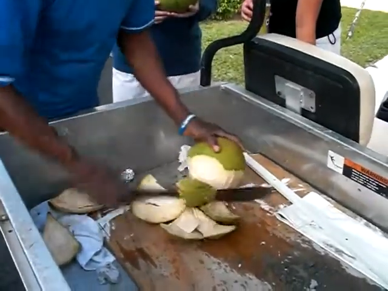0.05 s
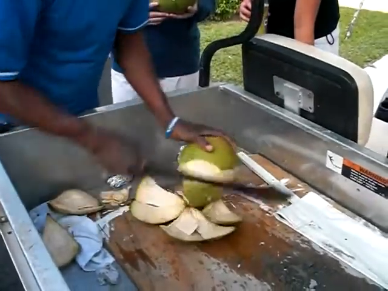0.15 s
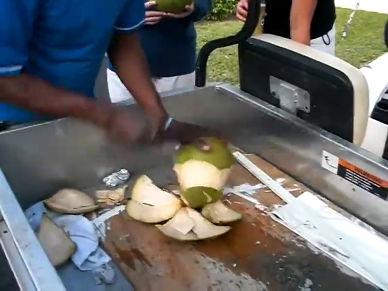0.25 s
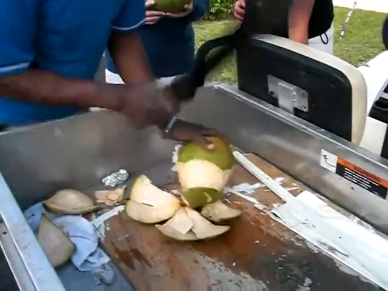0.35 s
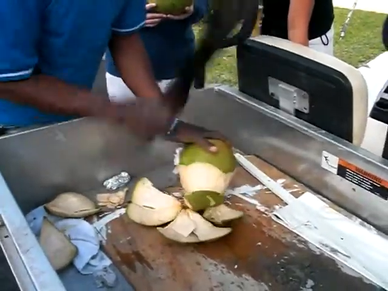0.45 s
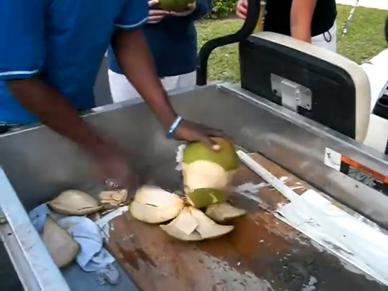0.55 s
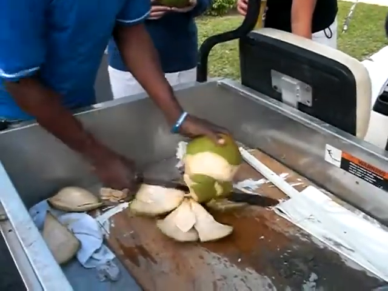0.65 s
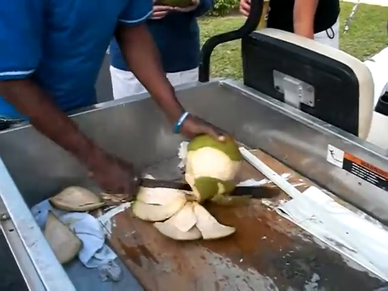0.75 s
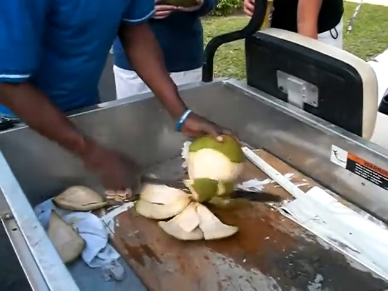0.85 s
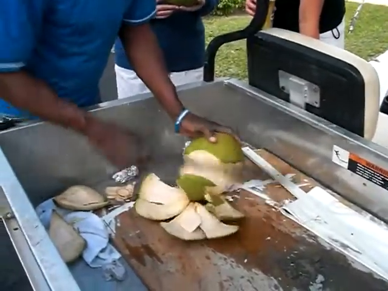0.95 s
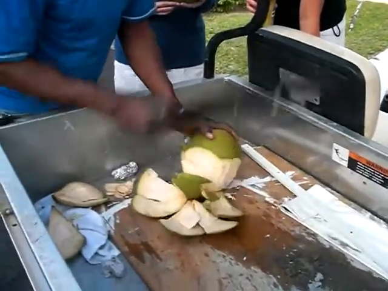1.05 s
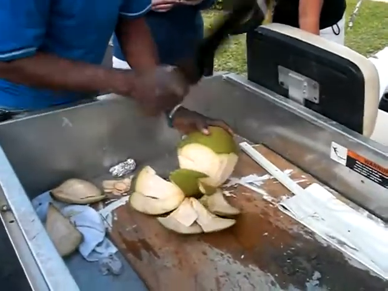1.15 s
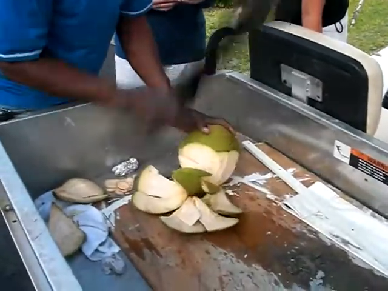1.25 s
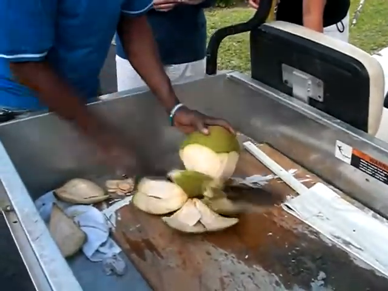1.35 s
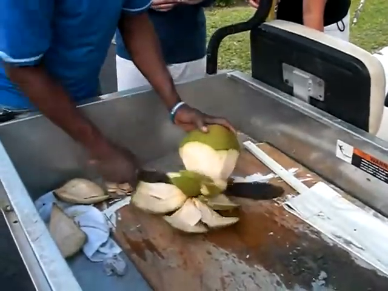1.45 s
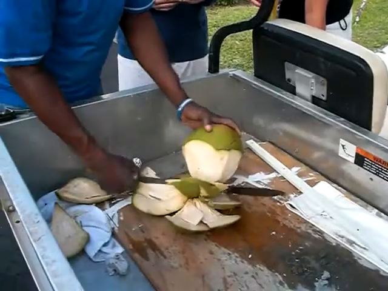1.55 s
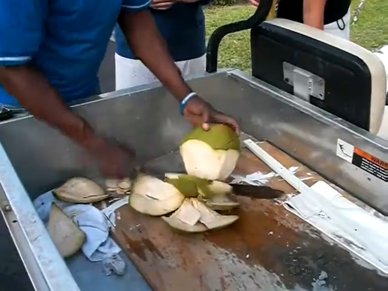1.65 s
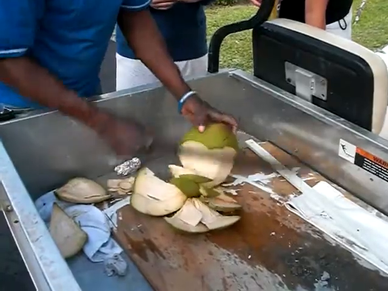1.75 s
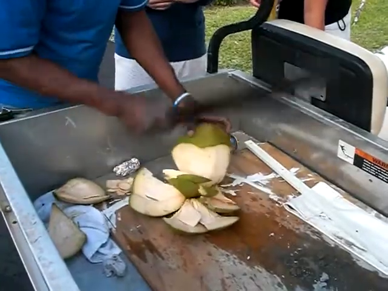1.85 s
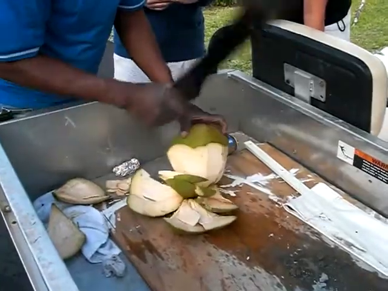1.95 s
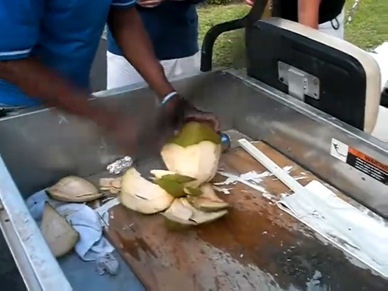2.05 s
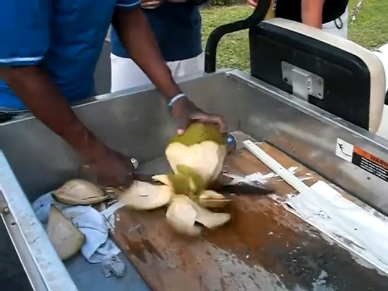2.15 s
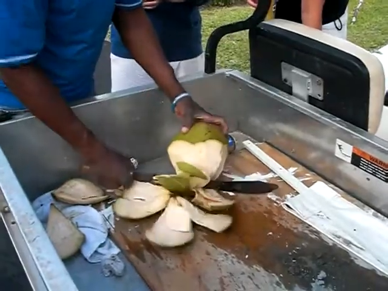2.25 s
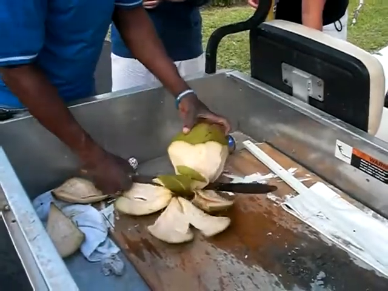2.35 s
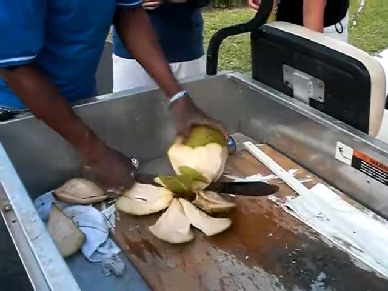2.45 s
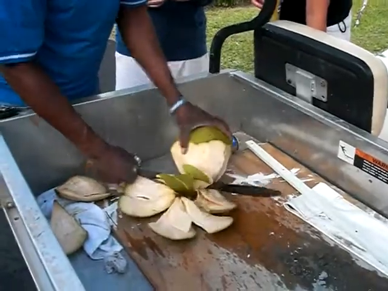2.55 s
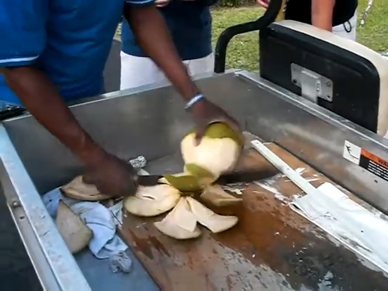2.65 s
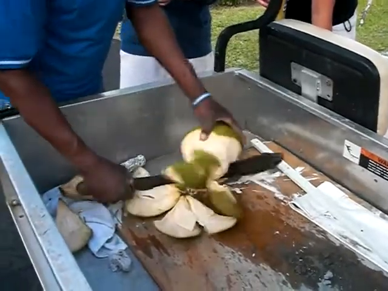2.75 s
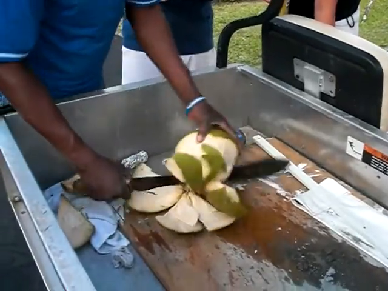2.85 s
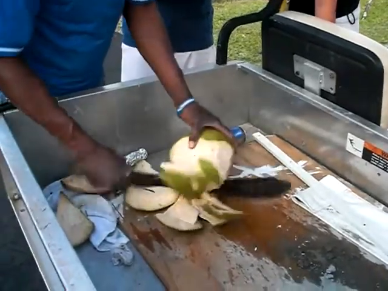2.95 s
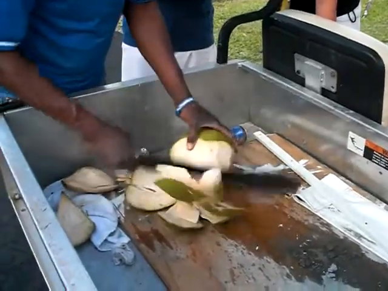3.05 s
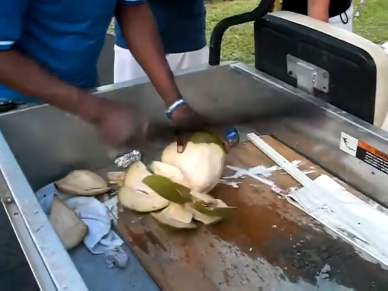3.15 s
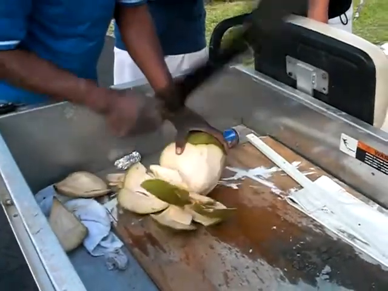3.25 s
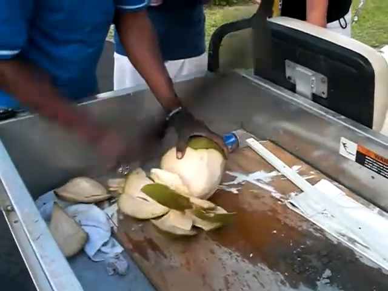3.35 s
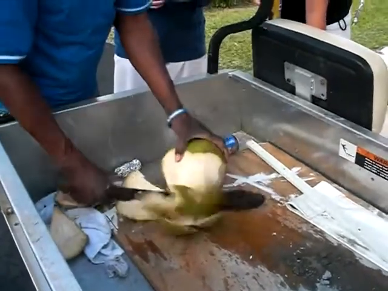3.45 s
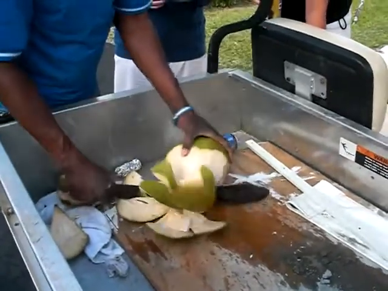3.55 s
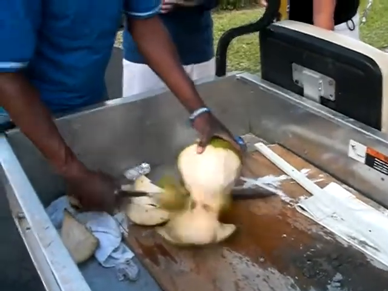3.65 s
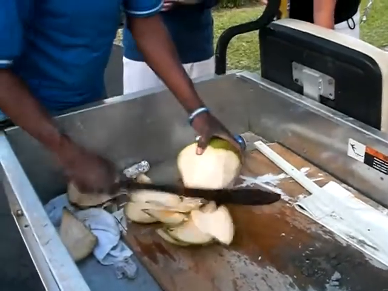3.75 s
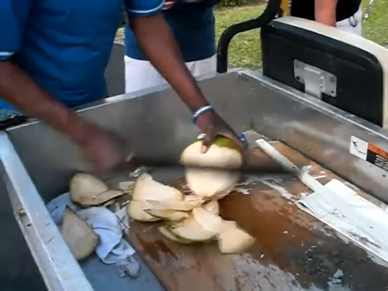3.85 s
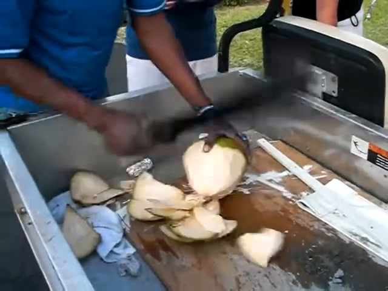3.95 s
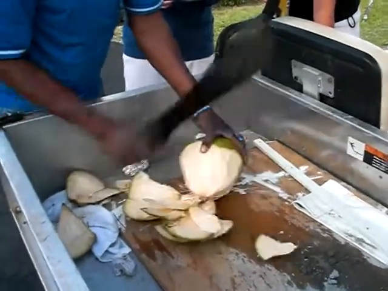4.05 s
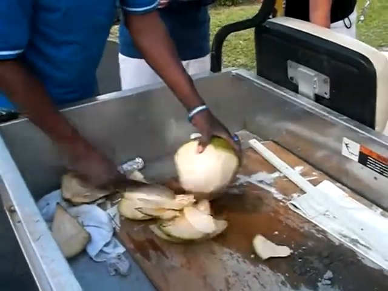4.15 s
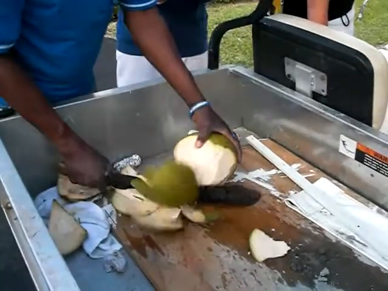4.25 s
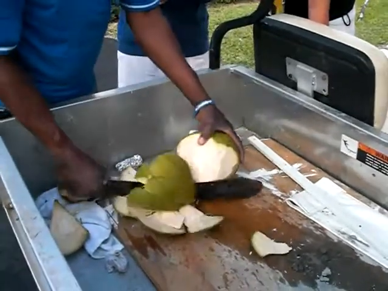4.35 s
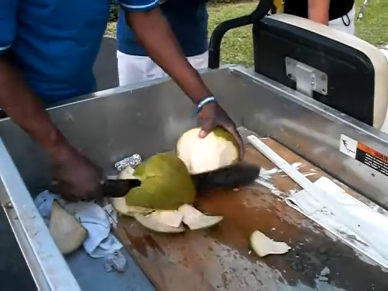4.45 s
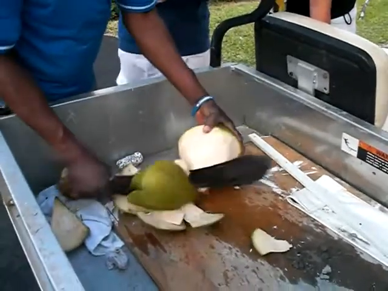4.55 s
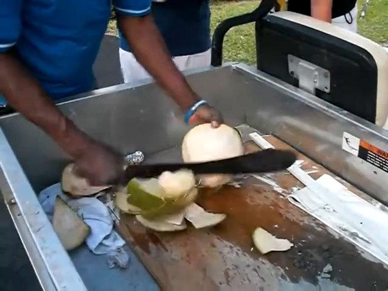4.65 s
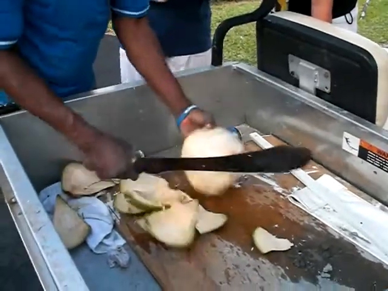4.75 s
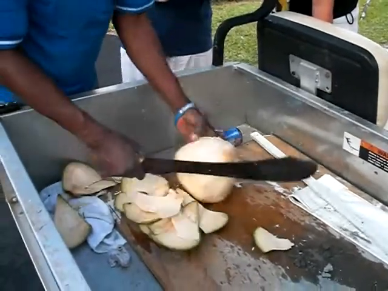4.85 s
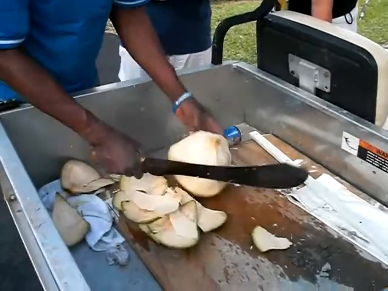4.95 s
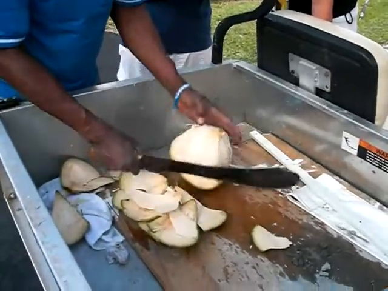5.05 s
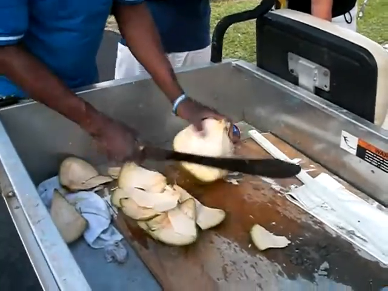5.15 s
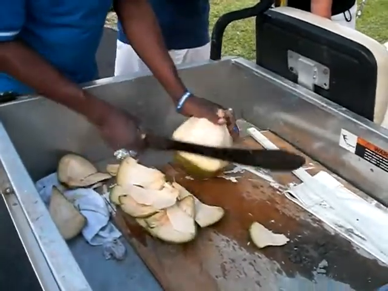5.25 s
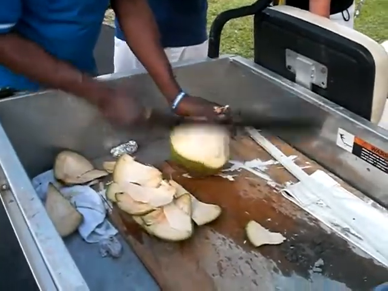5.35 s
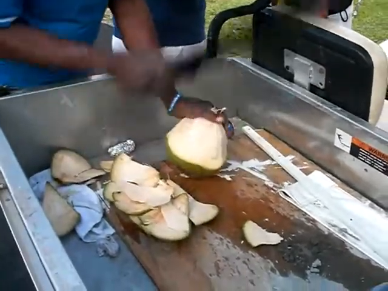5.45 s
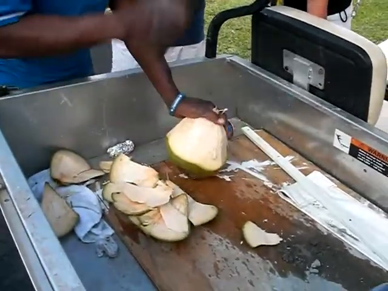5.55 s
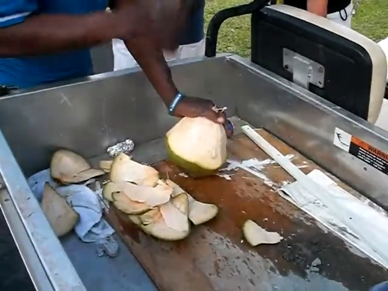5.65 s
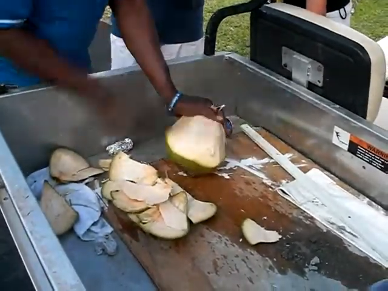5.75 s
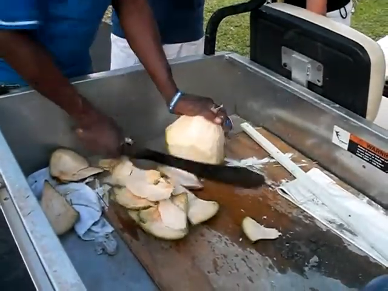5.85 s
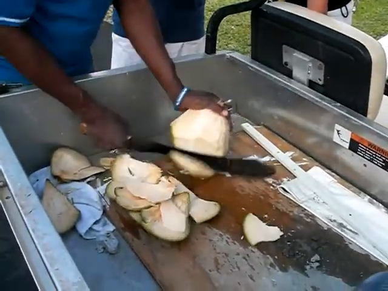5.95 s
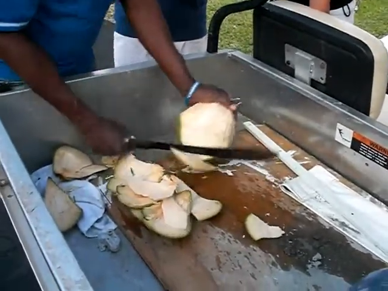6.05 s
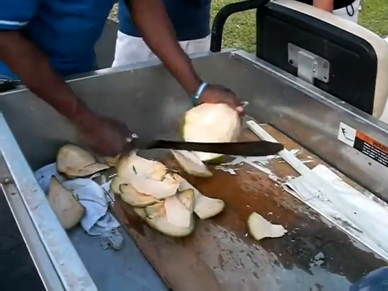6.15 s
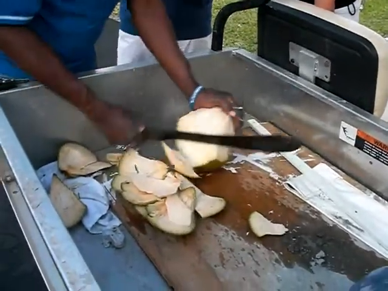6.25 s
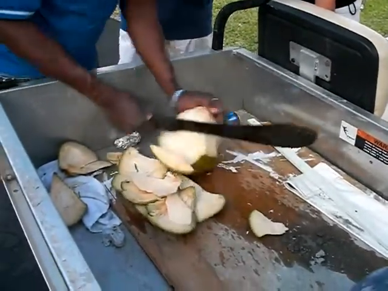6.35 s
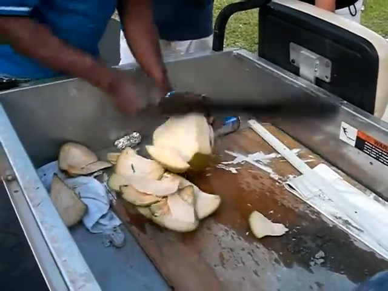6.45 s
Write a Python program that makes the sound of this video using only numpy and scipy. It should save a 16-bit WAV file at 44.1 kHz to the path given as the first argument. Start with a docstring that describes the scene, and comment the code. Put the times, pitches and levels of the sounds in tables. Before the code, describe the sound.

A close microphone outdoors is buffeted by low, fluttering wind from the first instant, over a faint uneven hiss. At about 0.55 s a machete rips wet husk and lands as a quick double knock on a wooden board, with crumbs and a short scrape after it. A deep, heavier thud comes at 1.35 s, then a sharper cracking whack at 2.13 s, each with a brief rattle of the sheet-metal bed. Light taps and faint scrapes lead to a more broken stroke at 3.43-3.6 s, with several clacks and dragging. Another chop at 4.17 s rattles the metal most; the blade scrapes free and sings very faintly near 4.65 s amid strong gusts. A short crisp chop follows at 4.81 s. Wind dies down after 5.1 s, leaving the loudest, brightest crack at 5.8 s, then tiny crumbs, taps and scrapes until 6.5 s.

```python
"""Gusts buffet the microphone from the start and on among the strokes of a machete that husks a green coconut.
The place is outdoors, on a wooden board in the sheet-metal bed of a cart, over a faint uneven background hiss.
In each of seven strokes shaped noise tears like wet fibre, then decaying modes and noise knock the board
and rattle the bed. Crumbs and taps are short noise bursts; scrapes are noise broken into slips. The wind is
low noise on a breeze curve with gusts, and pressure swings: random eddies and separately set hard buffets."""
import sys
import numpy as np
from scipy import signal
from scipy.fft import rfft, irfft, next_fast_len
from scipy.io import wavfile
from scipy.ndimage import map_coordinates

SR = 44100
rng = np.random.default_rng(int(sys.argv[2]) if len(sys.argv) > 2 else 0)


def output_pcm(signal):
    """Save a mono or channel-first signal as 16-bit PCM at the path in sys.argv[1].

    Samples are clipped to [-1, 1] before scaling.
    """
    pcm = np.clip(np.atleast_2d(signal).T, -1, 1) * 32767
    wavfile.write(sys.argv[1], SR, np.round(pcm).astype(np.int16))


N = 287091  # length in samples


def amp(db):
    """Decibels to gain."""
    return 10 ** (np.asarray(db) / 20)


def unit(x):
    """Scale to rms 1."""
    return x / np.sqrt(np.mean(x ** 2) + 1e-20)


def along(points, hz):
    """Join (Hz, value) points by straight lines over log frequency."""
    f, v = np.transpose(points)
    return np.interp(np.log(hz + 1), np.log(f), v)


def curves(rows):
    """One value per sample for each column after the time."""
    s, *cols = np.transpose(rows)
    return [np.interp(np.arange(N) / SR, s, c) for c in cols]


def wobble(rate, size):
    """A smooth random curve with rate knots a second."""
    knots = rng.standard_normal(size // 8)
    return map_coordinates(knots, [np.arange(size) * rate / SR], mode="wrap")


def noise(spectrum, size, tilt_db=0, ripple_db=0):
    """Noise of rms 1 with the given colour, a tilt in dB per octave and chance resonances."""
    hz = np.fft.rfftfreq(size, 1 / SR)
    resonances = map_coordinates(rng.standard_normal(140), [hz / 170])  # one knot every 170 Hz
    gain = amp(along(spectrum, hz) + tilt_db * np.log2(hz + 1) + ripple_db * resonances)
    gain = gain * hz / (hz + 20)  # nothing at 0 Hz
    return unit(irfft(rfft(rng.standard_normal(size)) * gain, size))


def fade(t, t60):
    """Exponential decay from t = 0, by 60 dB in t60 seconds."""
    return np.exp(-np.log(1000) * np.maximum(t, 0) / t60)


def causal(spectrum, size=2048):
    """Minimum-phase impulse response with the given colour, its energy as early as possible, of peak 1."""
    cepstrum = irfft(np.log(amp(along(spectrum, np.fft.rfftfreq(size, 1 / SR)))))
    # fold the cepstrum onto positive time
    cepstrum[1:size // 2] *= 2
    cepstrum[size // 2:] = 0
    h = irfft(np.exp(rfft(cepstrum)))
    return h / np.abs(h).max()


def high_pass(x, hz, order):
    """Shed the bass below hz."""
    return signal.sosfilt(signal.butter(order, hz, "high", fs=SR, output="sos"), x)


def add(track, s, sound):
    """Mix a sound into the track at s seconds."""
    part = track[max(round(s * SR), 0):][:len(sound)]
    part += sound[:len(part)]


def ringing(modes, t, level_db, detune):
    """Decaying sines, excited at slightly new strengths, pitches and phases each time."""
    out = 0
    for hz, db, t60 in modes:
        strength = amp(db + rng.normal(0, level_db))
        pitch = hz * (1 + rng.normal(0, detune))
        out = out + strength * fade(t, t60) * np.sin(2 * np.pi * pitch * t + rng.normal(0, 1.66))
    return out


# Colour of the background hiss. Each row: frequency in Hz, level in dB.
HISS_COLOUR = [(60, -2.5), (300, -7), (1000, -0.5), (1280, -2), (1700, -8), (2580, -5.5), (2800, -4),
               (7140, -11), (10500, -20), (12000, -22), (15600, -57)]
# How the hiss jumps up and down. Each row: time in seconds, relative level in dB.
HISS_LEVEL = [(0, -64), (.55, -63.5), (.75, -60), (1.4, -58), (1.65, -60.5), (2.12, -58), (2.38, -70.5),
              (2.85, -67), (3.4, -65), (3.6, -54.5), (3.88, -63.5), (4.28, -59), (4.5, -61.5), (4.85, -58),
              (5.03, -70.5), (5.75, -68), (6.51, -75)]


def hiss():
    """A faint background hiss of shaped noise whose level jumps up and down."""
    hiss_db, = curves(HISS_LEVEL)
    return amp(hiss_db + 2.5) * noise(HISS_COLOUR, N)


STRONG_DB = -28  # strength of a strong wind, the reference for flutter, rumble and eddies
BREEZE_DB = 4  # gain of the steady breeze
GUST_EDGE = 3.9  # how squarely a gust starts and stops
FLUTTER_DB, FLUTTER_GROWS = -39, 1.6  # flutter in a strong wind in dB, its dB per dB of wind
# The breeze on the microphone. Each row: time in seconds, relative strength in dB.
BREEZE = [(0, -32.5), (.33, -36.5), (.41, -37.5), (.88, -36.5), (1.1, -38.5), (1.27, -50), (1.48, -38),
          (1.82, -40), (2.05, -34), (2.34, -37.5), (2.47, -44.5), (2.63, -44), (2.79, -54), (2.9, -44),
          (3.3, -47), (3.66, -37), (3.83, -58), (3.92, -37.5), (4.3, -36.5), (4.48, -45.5), (4.75, -35.5),
          (5.15, -52.5), (5.4, -62), (5.62, -60), (6.1, -69.5), (6.51, -65)]
# Gusts on top of it. Each row: middle in seconds, length in seconds, strength in dB, extra flutter in dB.
GUSTS = [(0.014, 0.063, -27, 4.5), (0.176, 0.083, -26.5, 2), (0.272, .07, -30, 1.5),
         (0.486, 0.039, -30.5, 9), (0.783, .07, -28.5, -4), (1.009, 0.088, -28, 3.5), (1.157, .03, -37, -1),
         (1.592, 0.053, -27.5, -17), (1.985, 0.033, -32.5, -2.5), (2.061, 0.021, -23.5, 1),
         (2.981, 0.039, -32.5, -5), (3.097, 0.092, -33, -5), (3.385, .03, -38, -2),
         (3.55, 0.068, -28.5, -13), (3.962, 0.092, -34.5, -3), (4.709, 0.043, -26.5, -5.5),
         (5.012, .04, -37, -4), (5.097, 0.028, -32, -15), (5.521, 0.038, -46.5, -10)]


def airflow():
    """Wind and flutter strength in dB: gusts add power to the breeze, and flutter grows faster than wind."""
    t = np.arange(N) / SR
    power = amp(curves(BREEZE)[0] + BREEZE_DB) ** 2
    fluttering = power * amp(-4.5) ** 2
    for s, length, db, extra_db in GUSTS:
        gust = amp(db) ** 2 * np.exp(-np.abs(2 * (t - s) / length) ** GUST_EDGE)
        power = power + gust
        fluttering = fluttering + gust * amp(extra_db) ** 2
    wind_db = 10 * np.log10(power)
    extra_flutter_db = 10 * np.log10(fluttering / power)
    return wind_db, FLUTTER_DB + FLUTTER_GROWS * (wind_db - STRONG_DB) + extra_flutter_db


EDDY_RATE, EDDY_DB, EDDY_SCATTER_DB = 35, 0, 3  # lesser eddies a second, level over the wind, its spread
EDDY_HZ, EDDY_OCTAVES_PER_DB = 250, .05  # typical pitch in a strong wind; faster air makes shorter swings
# The hardest single buffets. Each row: middle in seconds, relative level in dB, nominal pitch in Hz.
BUFFETS = [(.04, -19.5, 440), (.083, -19, 201), (.147, -20.5, 300), (.166, -15.5, 387), (.189, -17, 259),
           (.284, -20, 360), (.414, -26, 315), (.478, -21, 387), (.763, -16.5, 246), (.814, -14, 161),
           (.985, -15.5, 303), (1.855, -23, 230), (1.916, -12, 179), (1.977, -20, 286), (2.058, -10.5, 332),
           (2.071, -10.5, 192), (2.895, -27, 170), (3.144, -24, 170), (3.896, -24, 204), (3.972, -20, 250),
           (4.341, -20, 189), (4.622, -15, 295), (4.696, -16, 169), (4.79, -13, 252)]


def eddies(wind_db):
    """Eddies strike the port: set hard buffets, and random lesser ones, stronger and faster in stronger wind."""
    out, t = np.zeros(N), np.arange(-SR // 40, SR // 40) / SR
    strikes = list(BUFFETS)
    chance = rng.standard_normal((600, 3))
    for k, (late, size, pitch) in enumerate(chance):
        s = (k + .4 * late) / EDDY_RATE
        if 0 <= s * SR < N:
            db = wind_db[int(s * SR)]
            octaves = EDDY_OCTAVES_PER_DB * (db - STRONG_DB) + .35 * pitch
            strikes.append((s, db + EDDY_DB + EDDY_SCATTER_DB * size, EDDY_HZ * 2 ** octaves))
    for s, db, hz in strikes:
        # the pressure swings one way and back as the eddy passes
        u = np.pi * hz * t
        swing = -2 * np.sqrt(2) * u / (1 + u * u) ** 2 * np.exp(-u * u / 20)
        add(out, s + t[0], amp(db) * swing)
    return out


DEEP_DB, BODY_DB, BODY_GROWS = -5, -1.5, 0.1  # rumble parts in dB; the body's extra dB per dB of wind
# Colours of the deep rumble, the rumble's body and the flutter. Each row: frequency in Hz, level in dB.
DEEP_COLOUR = [(25, -28.5), (60, -2), (95, 1.5), (140, -5), (250, -23), (500, -61)]
BODY_COLOUR = [(15, -51.5), (25, -33.5), (59, -1), (102, 7), (230, -1.5), (327, -12.5), (365, -13.5),
               (500, -30), (650, -48), (1100, -120)]
FLUTTER_COLOUR = [(120, -25), (250, 2), (350, 2.5), (500, -7), (800, -18.5), (1200, -27.5), (2000, -50.5),
                  (4000, -85)]


def wind():
    """Turbulence at the port: lumpy rumble, deeper in weak wind, sharper flutter on its crests, and eddies."""
    wind_db, flutter_db = airflow()
    lumps = wobble(35, N)
    deep = amp(DEEP_DB) * noise(DEEP_COLOUR, N)
    body_db = BODY_DB + BODY_GROWS * (wind_db - STRONG_DB)
    body = amp(body_db) * unit(amp(1.9 * lumps) * noise(BODY_COLOUR, N))
    bursts = amp(2.6 * lumps + 3.8 * wobble(130, N))
    flutter = amp(flutter_db) * unit(bursts * noise(FLUTTER_COLOUR, N))
    return amp(wind_db) * (deep + body) + flutter + eddies(wind_db)


# Ring of the metal bed. Each row: frequency in Hz, time to fall 60 dB in seconds.
BED_RING = [(100, 0.36), (380, 0.6), (1200, 0.41), (3200, .4), (6000, .27), (12000, .2)]


def dying(x):
    """Each band of x dies away as the metal bed does."""
    hz, t, z = signal.stft(x, SR, nperseg=256)
    decay = fade(t, along(BED_RING, hz)[:, None])
    return signal.istft(z * decay, SR, nperseg=256)[1][:len(x)]


# Sheet-metal walls. Each row: nominal frequency in Hz, mean level in dB, time to fall 60 dB in seconds.
PANEL = [(374, 2.5, 0.7), (808, -7.5, 0.44), (958, -6.5, 0.99), (1215, -1, 0.58), (1457, -0.5, 0.52),
         (1677, -6, 0.7), (1830, -4.5, 0.65), (2025, -3, 0.39), (2270, -2.5, 0.37), (2545, -2, .45),
         (2790, -6, 0.29), (2980, -8, 0.29), (3190, -2.5, 0.4), (3490, -3.5, 0.35), (3550, -3, 0.33),
         (4140, -6.5, 0.22)]


def bed(x):
    """The metal bed answers with a diffuse tail and the tones of its walls."""
    t = np.arange(SR * 3 // 5) / SR
    colour = [(200, -3.5), (1500, 4.5), (3800, -2.0), (6500, -10.5), (12000, -11.5)]  # (Hz, dB)
    tail = dying(noise(colour, len(t)))
    tones = ringing(PANEL, t, level_db=2.5, detune=.003)
    answer = amp(-19.5) * tail / np.linalg.norm(tail) + amp(-26.5) * tones / np.linalg.norm(tones)
    return signal.fftconvolve(x, answer)[:N]


def tap(dull_db, snap_db):
    """One small contact: a dull tick, a bright click and a wet snap, each a decaying noise burst."""
    t = np.arange(SR // 10) / SR
    # colours: (Hz, dB)
    dull_colour = [(300, -16.0), (900, 1.0), (1800, -4.5), (3500, -16), (9000, -41.5)]
    click_colour = [(1200, -21.5), (3000, 3.5), (4800, 1), (8000, -18)]
    snap_colour = [(3000, -36), (6500, 1.5), (12000, -10.5)]
    dull = amp(dull_db) * noise(dull_colour, len(t), ripple_db=5.5) * fade(t, .055)
    click = amp(-9.5) * noise(click_colour, len(t), ripple_db=6) * fade(t, 0.057)
    snap = amp(snap_db) * noise(snap_colour, len(t)) * fade(t, 0.031)
    return amp(-1.0) * (dull + click + snap) * (1 - np.exp(-t / .0005))


CRUMB_FADE_DB_PER_S, CRUMB_SCATTER_DB = 59.5, 2.5  # later crumbs land more softly on average
CRUMB_DULL_DB, CRUMB_SNAP_DB = -4, -20.5  # colour of a crumb's tap; the snap is a mean
# Crumbs of husk that a stroke throws about.
# Each row: start in seconds, length of the shower in seconds, relative level in dB.
SHOWERS = [(.62, 0.14, -29), (1.43, 0.092, -37), (2.185, 0.24, -40), (3.58, .12, -37), (4.3, .14, -38.5),
           (5.875, .18, -37.5)]


def crumbs(count=5):
    """After a stroke a few crumbs land at uneven moments, more softly as the shower goes on."""
    out = np.zeros(N)
    for s, length, db in SHOWERS:
        for delay in length * (np.arange(count) + rng.random(count)) / count:
            level_db = db - CRUMB_FADE_DB_PER_S * delay + rng.normal(0, CRUMB_SCATTER_DB)
            add(out, s + delay, amp(level_db) * tap(CRUMB_DULL_DB, CRUMB_SNAP_DB + rng.normal(0, 4)))
    return out


# Blade and larger husk pieces tapping the board.
# Each row: start in seconds, relative level in dB, dull part in dB, wet snap in dB.
TAPS = [(.6988, -32, -8.5, -17.5), (.7768, -33, -16, -5.5), (.9158, -37.5, -0.5, -32),
        (1.4102, -26.5, -6, -22), (1.529, -44, -4, -2.5), (1.6501, -38.5, -9.5, -12.5),
        (2.2272, -34, -12.5, -19), (2.2877, -50, -1, -15), (2.358, -51.5, -30, -7.5), (2.606, -51, -28, 1),
        (2.6254, -48.5, -27.5, -1), (3.4484, -19.5, -10.5, -10.5), (3.494, -19, -8.5, -31),
        (3.5364, -25, -10.5, -20), (3.6374, -27, -20, -21), (3.6822, -36.5, -18.5, -5.5),
        (3.7912, -47, 0, -16.5), (4.0592, -35, 3.5, -34), (4.2365, -25.5, -30, -14.5),
        (4.282, -20.5, -41, -14), (4.9132, -33, -2, -25), (5.9554, -40.5, -26, -17),
        (6.0764, -47, -14, -7.5)]


def taps():
    """The blade and the larger pieces of husk touch the board."""
    out = np.zeros(N)
    for s, db, dull_db, snap_db in TAPS:
        add(out, s, amp(db) * tap(dull_db, snap_db))
    return out


# Colour of a scrape. Each row: frequency in Hz, level in dB.
SCRAPE_COLOUR = [(500, -13), (1500, -1.5), (3200, 0), (4800, -3), (6500, -14), (12000, -24.5)]
# The blade dragged over husk and board.
# Each row: start in seconds, length in seconds, relative level in dB, treble tilt in dB per octave.
SCRAPES = [(.63, 0.17, -50.5, 1.5), (2.601, 0.18, -59.5, 6.5), (2.832, 0.17, -59, -1.5),
           (3.552, 0.15, -45.5, -3.5), (3.686, 0.11, -48, -6.5), (4.281, 0.035, -35, 1),
           (4.31, 0.058, -44, -2), (4.931, .085, -50.5, -1.5), (5.987, 0.13, -50, -5.5),
           (6.17, .08, -65.5, 3), (6.29, 0.038, -66.5, 1.5), (6.453, 0.078, -67, 0.5)]


def scrapes():
    """The blade catches and slips on fibre while it is levered out."""
    out, t = np.zeros(N), np.arange(SR // 4) / SR
    for s, length, db, tilt_db in SCRAPES:
        stroke = (1 - np.exp(-t / 0.0056)) * np.sqrt(np.clip(1 - t / length, 0, 1))
        slips = unit(amp(4.7 * wobble(300, len(t))))
        add(out, s, amp(db) * stroke * slips * noise(SCRAPE_COLOUR, len(t), tilt_db, ripple_db=5.0))
    return out


# Tones of the free steel blade. Each row: frequency in Hz, relative level in dB.
BLADE_TONES = [(2600, 5), (3900, 2), (5000, 2), (5700, -2.5), (7350, -8), (8300, -4), (10400, -3)]


def blade(s=4.652, db=-52, t60=0.16):
    """The steel sings faintly as it slips free of the husk, roughened by a random wander of each phase."""
    out, t = np.zeros(N), np.arange(SR // 2) / SR
    ring = 0
    for hz, level in BLADE_TONES:
        blur = 0.9 * wobble(260, len(t))  # radians
        ring = ring + amp(level) * np.sin(2 * np.pi * hz * t + blur)
    add(out, s, amp(db) * ring * fade(t, t60) * (1 - np.exp(-t / 0.0061)))
    return out


# Colour of tearing fibre. Each row: frequency in Hz, level in dB.
FIBRE_COLOUR = [(240, -27), (400, -1.5), (792, -12.5), (1460, -6), (1890, -14), (2540, -2.5), (3240, -7.5),
                (3630, -3.5), (4900, -8.5), (5730, -11), (6700, -10.5), (12000, -20.5), (15600, -50),
                (22000, -120)]
# The blade tearing through fibre. Each row: start in seconds, length in seconds, relative level in dB,
# swell to the end in dB, treble tilt in dB per octave.
CUTS = [(0.5443, 0.02, -24, 2, 0), (1.333, 0.026, -21.5, 0.5, 0), (2.111, 0.015, -21.5, 9, 0),
        (3.409, 0.016, -37.5, 3, 2), (3.427, 0.0073, -28.5, 1, 1.5), (3.436, 0.024, -29, -2.5, -8),
        (4.1612, .014, -22, -4.5, -0.5), (4.8122, 0.005, -18.5, -6, 1.5), (5.7839, 0.024, -25, 10.5, -.5)]


def cuts():
    """Fibres snap in dense clumps while the blade travels through the husk, then the tearing dies away."""
    out, t = np.zeros(N), np.arange(SR // 5) / SR
    for s, length, db, swell_db, tilt_db in CUTS:
        travel = amp(swell_db * (np.minimum(t / length, 1) - .5)) * (1 - np.exp(-t / 0.0011))
        release = fade(t - length, 0.051) + amp(-8.0) * fade(t - length, 0.08)
        clumps = unit(amp(4.8 * wobble(1400, len(t))))
        tearing = noise(FIBRE_COLOUR, len(t), tilt_db, ripple_db=2.5)
        add(out, s, amp(db - 3) * travel * release * clumps * tearing)
    return out


WOOD_T60 = 0.12  # decay of the dense upper modes in seconds
KNOCK_LOW_HZ, KNOCK_LOW_CYCLES = 40, 0.034  # low edge of a knock; it rises by these cycles per contact time
# Board on the bed. Each row: nominal frequency in Hz, level in dB, time to fall 60 dB in seconds.
BOARD = [(85, -15, 0.31), (112, -7.5, 0.17), (146.5, -1.5, 0.15), (171.2, -5, 0.24), (203, -6.5, 0.19),
         (232.6, -6, 0.16), (268, -5.5, 0.14), (312, -5, 0.2), (353, -4.5, 0.26), (377, -8.5, 0.19),
         (430, -8, 0.064), (466.6, -11, 0.045), (557, -9, 0.23), (635, -17.5, 0.096), (841, -12.5, 0.17)]
# Dense upper modes of the board. Each row: multiple of the wood pitch, level in dB.
WOOD_COLOUR = [(.3, -25), (.7, -6.5), (1, 0.5), (1.3, -6), (2, -15.5), (5, -43.5)]
# Colours of the edge's crack and the bed's loose parts. Each row: frequency in Hz, level in dB.
CRACK_COLOUR = [(200, -9), (450, 3), (650, -2.5), (900, 3), (1200, -8), (1550, 3.5), (1950, -10.5),
                (2300, -0.5), (3200, -15), (5000, -14), (8000, -25), (12000, -28.5)]
RATTLE_COLOUR = [(150, -11.5), (330, 8.5), (600, -4), (663, -11), (842, -2), (930, -2.5), (1080, -1.5),
                 (1320, -10.5), (1660, -6), (1850, -9), (3340, -9), (4930, -16.5), (6100, -17),
                 (11600, -36), (15600, -71.5)]
# Blows through nut and board. Each row: start in seconds, knock, crack and rattle as relative levels in dB,
# contact time in seconds, wood level in dB, wood pitch in Hz.
BLOWS = [(.567, -16.5, -39, -36.5, 0.00081, -34.5, 550), (.595, -11.5, -35, -41, 0.0009, -32.5, 580),
         (1.346, -31, -33, -34.5, 0.0014, -34, 700), (1.353, -3.5, -32, -33, 0.004, -24.5, 370),
         (2.1332, -6, -13, -35, 0.00099, -18.5, 850), (3.444, -12, -27, -38.5, 0.0013, -30.5, 450),
         (3.46, -14, -32.5, -32, 0.0013, -34, 450), (3.535, -15.5, -36, -41, .0023, -44, 500),
         (3.6, -27, -41, -39.5, 0.002, -45, 500), (4.172, -8.5, -22, -28.5, 0.001, -29, 650),
         (4.815, -11.5, -17, -33, .00094, -28, 850), (5.8006, -5, -3, -30.5, 0.00082, -12, 424)]


def blows():
    """A push rings the board, the edge cracks against it and the bed rattles on."""
    out, t = np.zeros(N), np.arange(SR * 3 // 5) / SR
    for s, knock_db, crack_db, rattle_db, contact, wood_db, wood_hz in BLOWS:
        # the nut itself gives one dead thud; a longer contact leaves only the low modes
        thud = amp(1.0) * np.sin(2 * np.pi * 215 * t) * fade(t, .03)
        struck = thud + ringing(BOARD, t, level_db=0.0, detune=.02)
        push = t * np.exp(-t / (contact / 5))
        knock = signal.fftconvolve(struck, push / push.sum())[:len(t)]
        knock = high_pass(knock, hz=KNOCK_LOW_HZ + KNOCK_LOW_CYCLES / contact, order=3)
        # the board's short upper ring depends on where the edge lands
        wood_colour = [(ratio * wood_hz, db) for ratio, db in WOOD_COLOUR]
        wood = noise(wood_colour, len(t)) * fade(t, WOOD_T60) * (1 - np.exp(-t / .001))
        wood = high_pass(wood, hz=151, order=2)
        # one sharp contact, then a few milliseconds of chatter
        chatter = .17 * rng.standard_normal(len(t)) * fade(t, 0.028)
        chatter[0] = 0.88
        crack = signal.fftconvolve(chatter, causal(CRACK_COLOUR))[:len(t)]
        crack = high_pass(crack, hz=120, order=2)
        # loose parts buzz, and the walls keep a few tones
        buzz = dying(noise(RATTLE_COLOUR, len(t), ripple_db=1.0)) * amp(2.5 * wobble(150, len(t)))
        walls = amp(-16.5) * ringing(PANEL, t, level_db=3.5, detune=0.0072)
        rattle = (buzz + walls) * (1 - np.exp(-t / 0.0021))
        blow = amp(knock_db - 7.0) * knock + amp(wood_db) * wood
        blow = blow + amp(crack_db + 2.5) * crack + amp(rattle_db) * rattle
        add(out, s, blow)
    return out


def scene():
    """The background hiss, the wind, the work sounds and the ring of the husk sounds in the metal bed."""
    background = hiss() + wind()
    husk = scrapes() + crumbs() + taps() + cuts()
    return (background + husk + bed(husk) + blade() + blows())[None]


TOP_HZ = 12180  # upper limit of the microphone's band


def record(dry):
    """The microphone flattens the hardest peaks, sheds deep bass and has a band limit."""
    x = dry / (1 + np.abs(dry / .74) ** 6) ** (1 / 6)
    x = high_pass(x, hz=58.5, order=4)
    size = next_fast_len(N + SR // 4)
    passed = np.fft.rfftfreq(size, 1 / SR) < TOP_HZ
    return irfft(rfft(x, size) * passed, size)[:, :N]


dry = scene()
out = record(dry)
output_pcm(out)
```